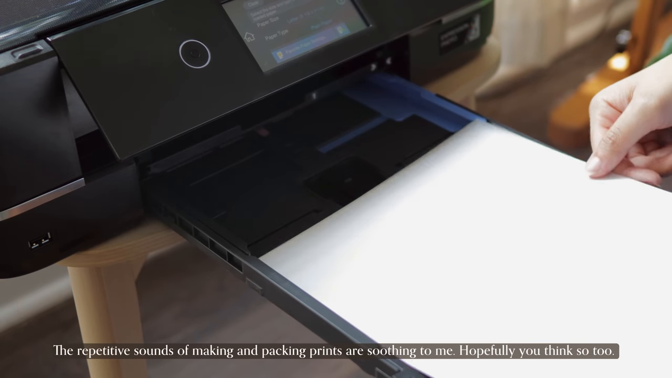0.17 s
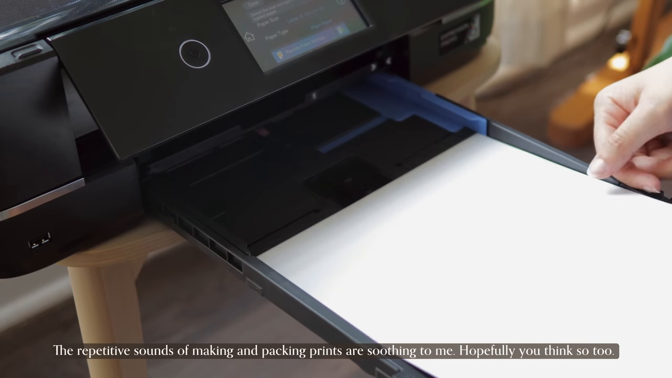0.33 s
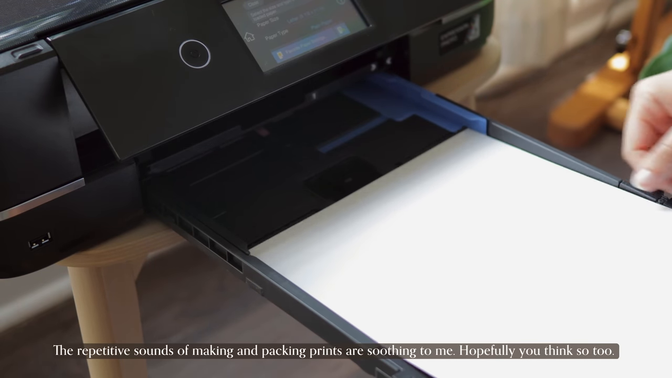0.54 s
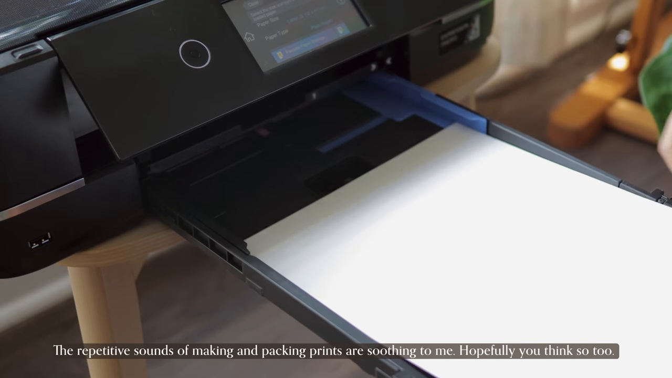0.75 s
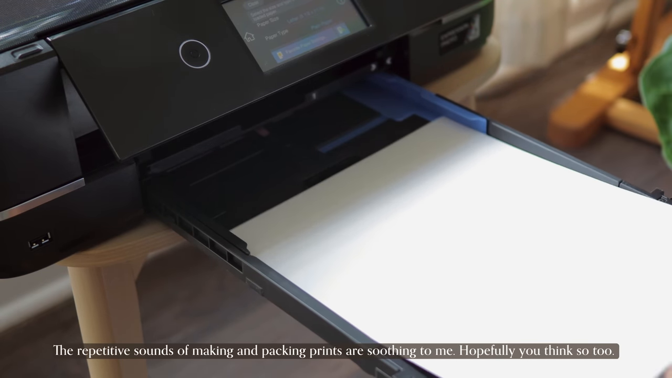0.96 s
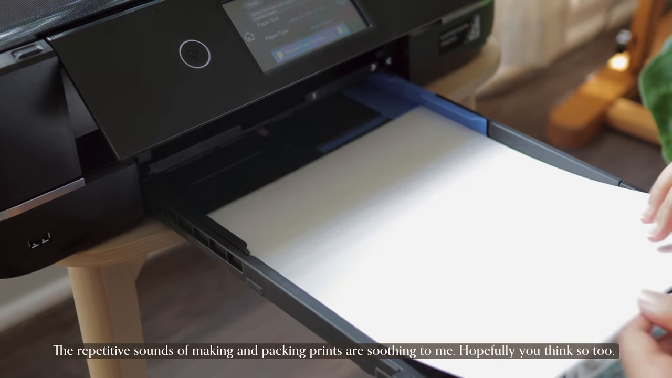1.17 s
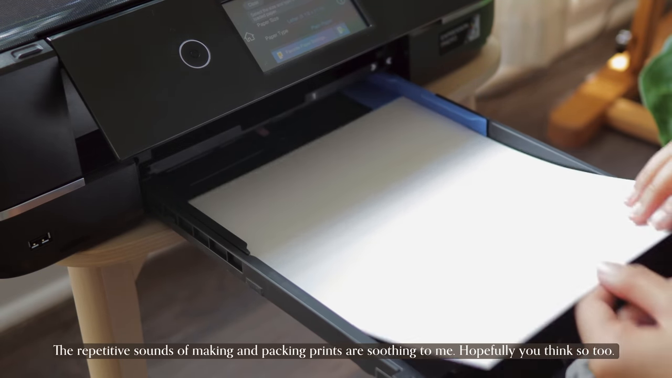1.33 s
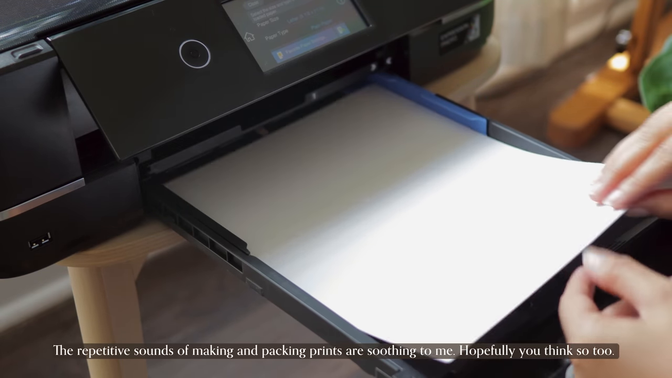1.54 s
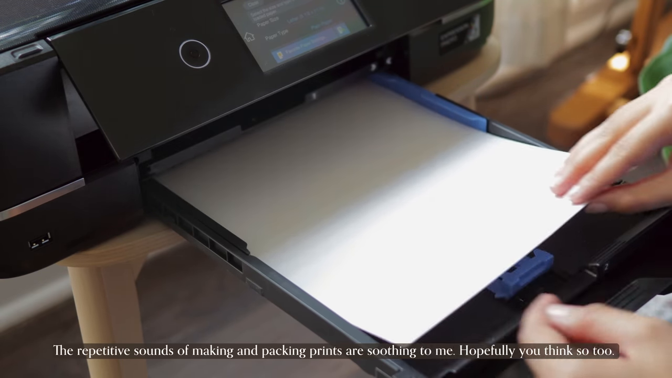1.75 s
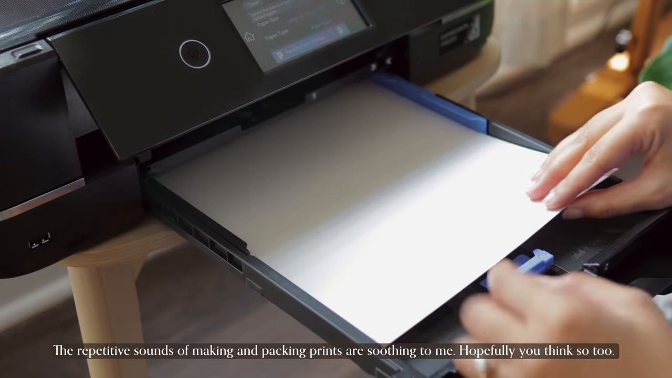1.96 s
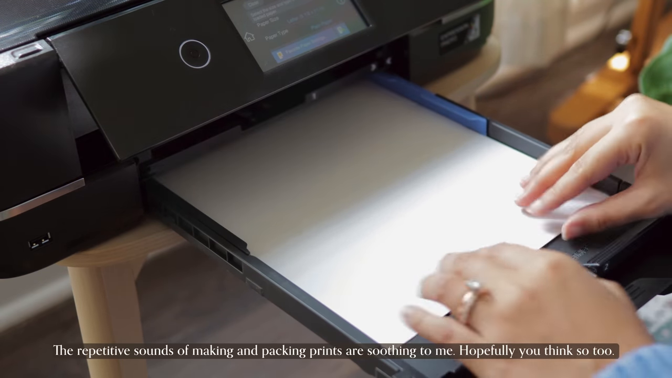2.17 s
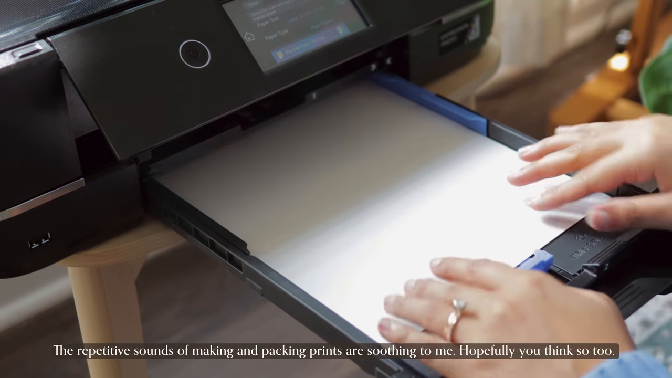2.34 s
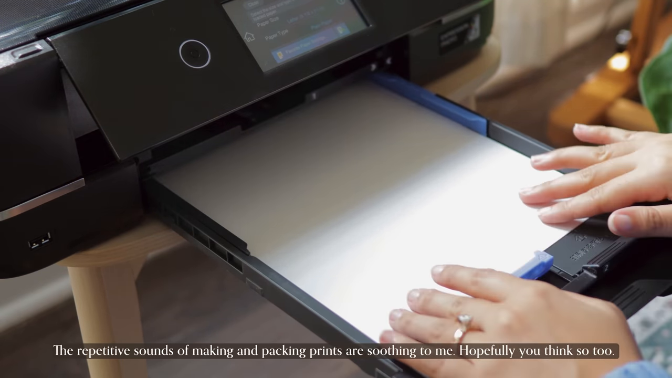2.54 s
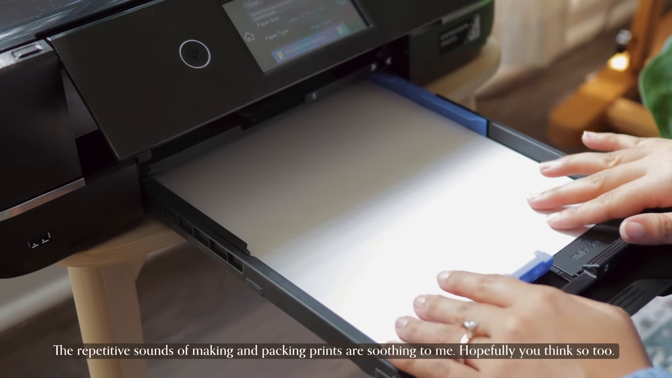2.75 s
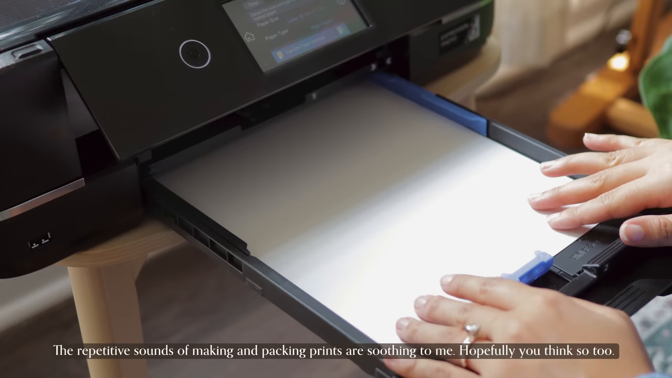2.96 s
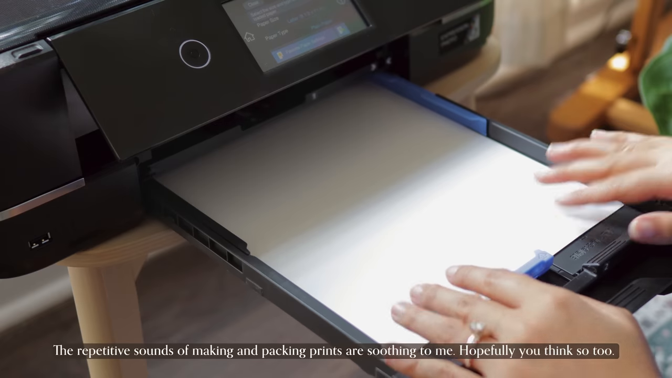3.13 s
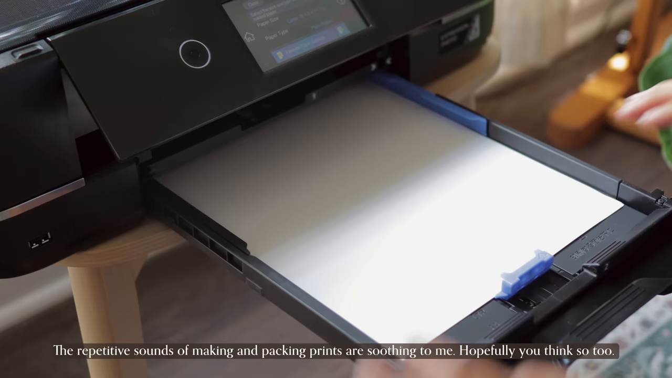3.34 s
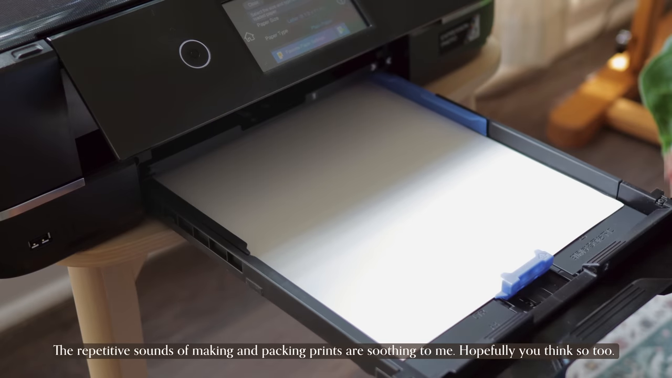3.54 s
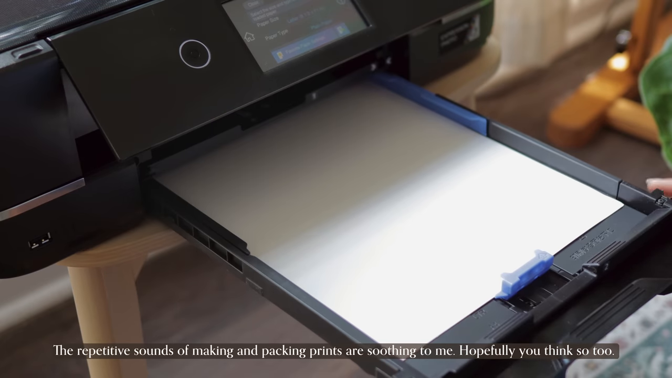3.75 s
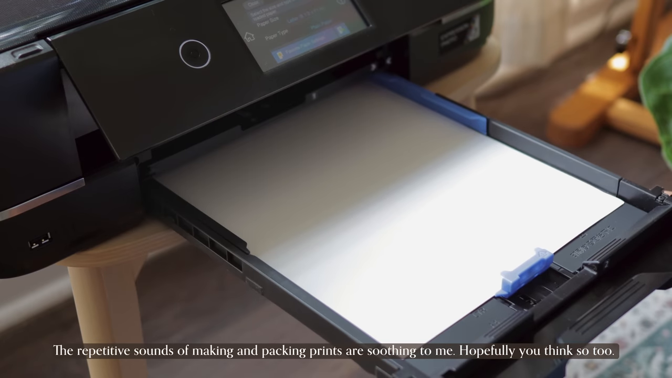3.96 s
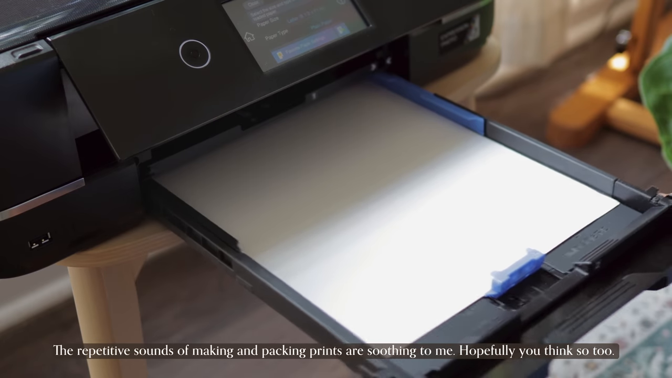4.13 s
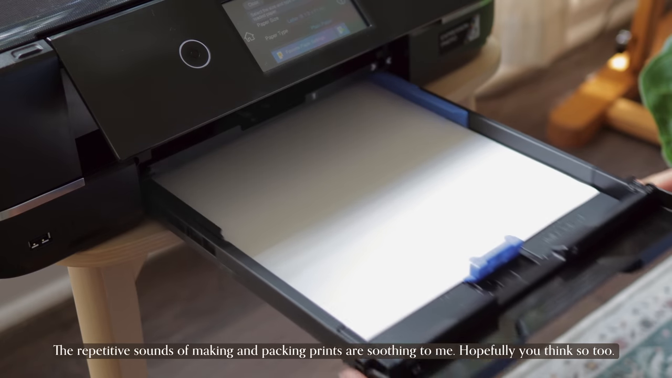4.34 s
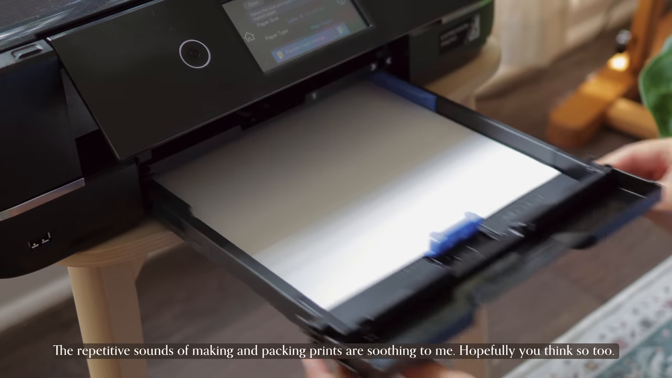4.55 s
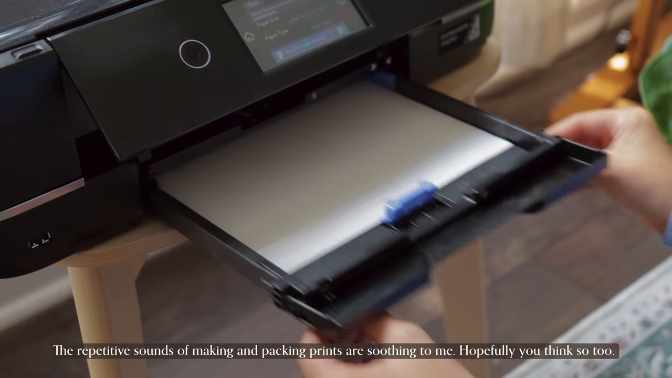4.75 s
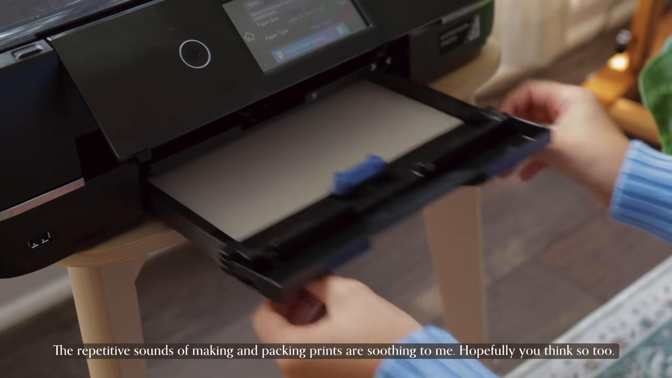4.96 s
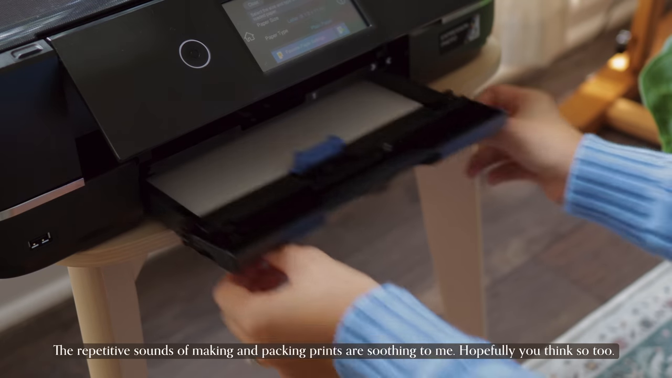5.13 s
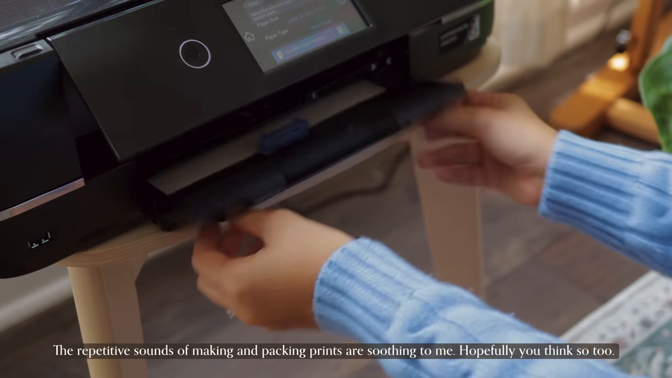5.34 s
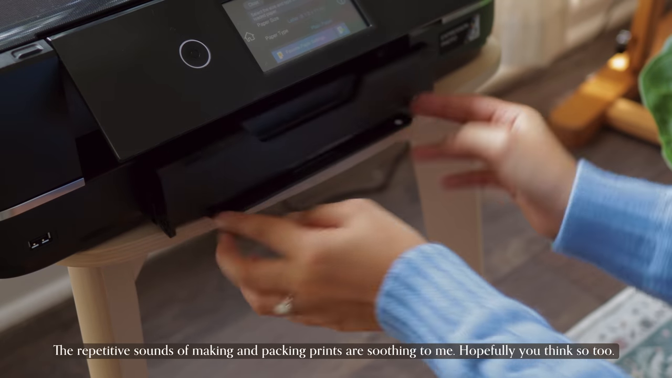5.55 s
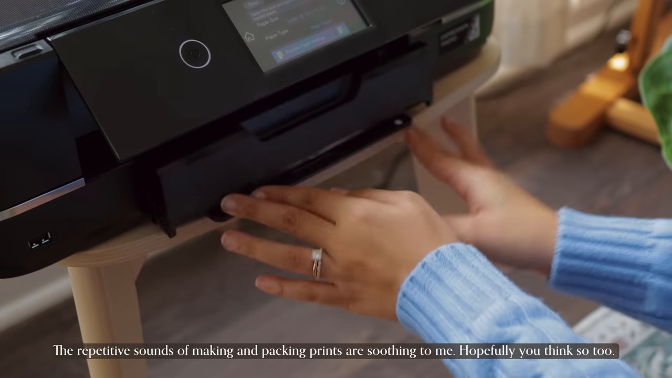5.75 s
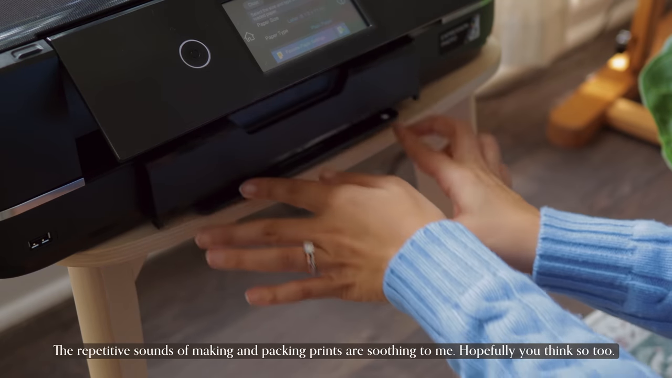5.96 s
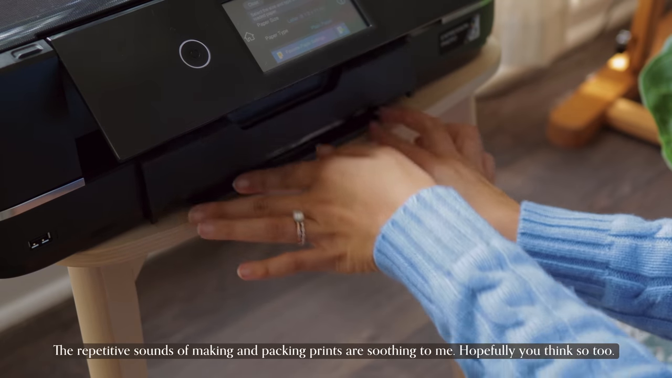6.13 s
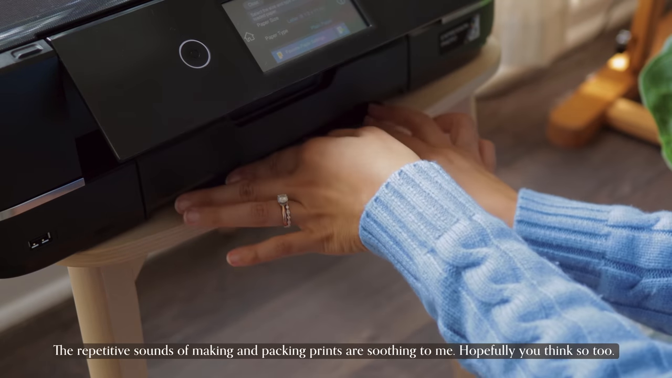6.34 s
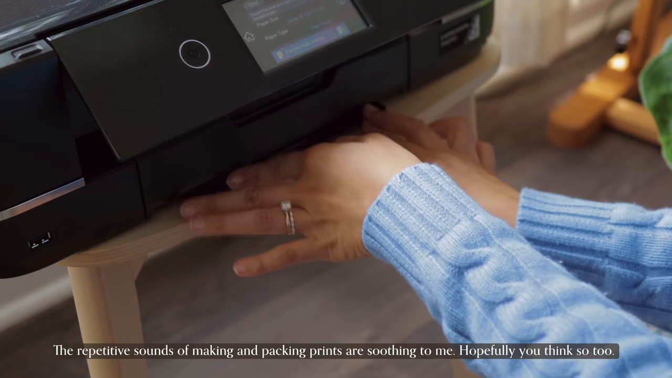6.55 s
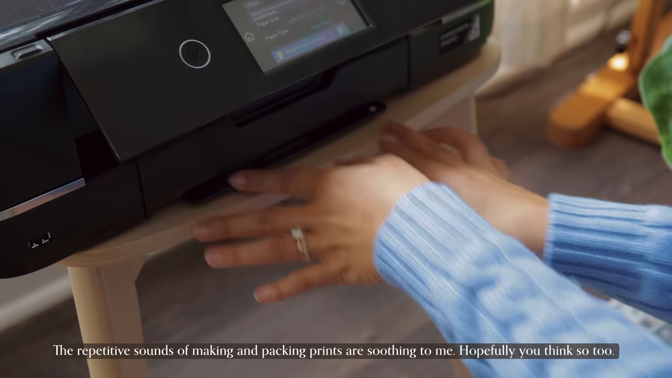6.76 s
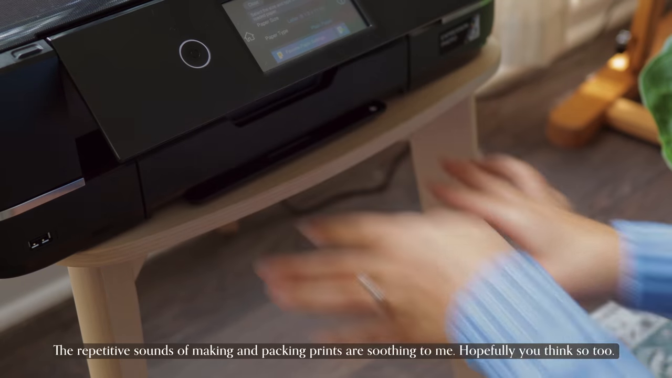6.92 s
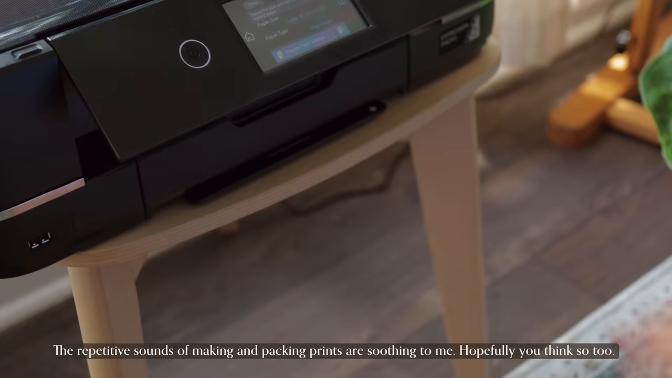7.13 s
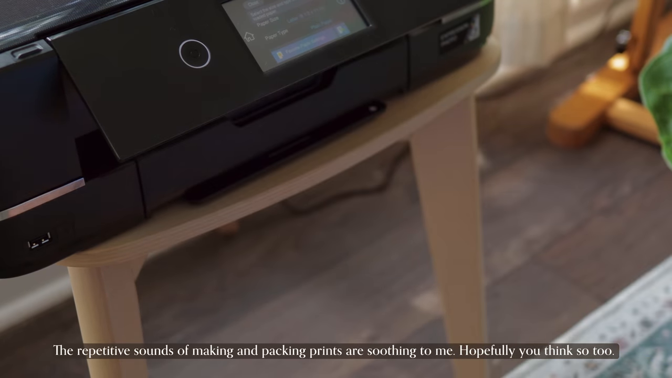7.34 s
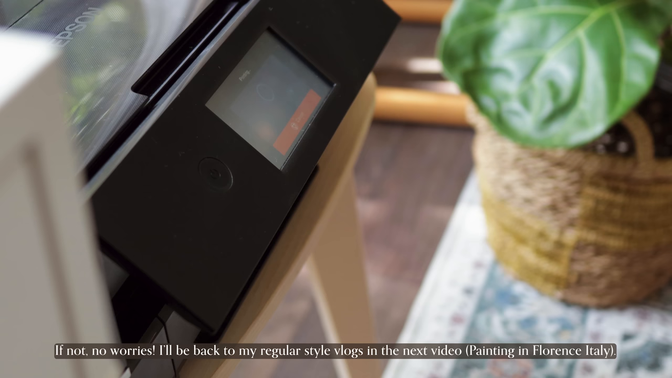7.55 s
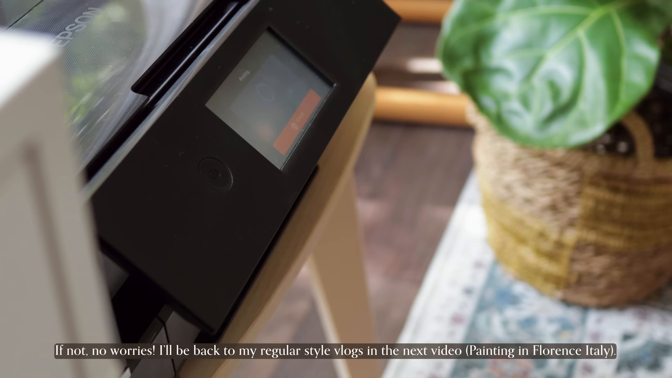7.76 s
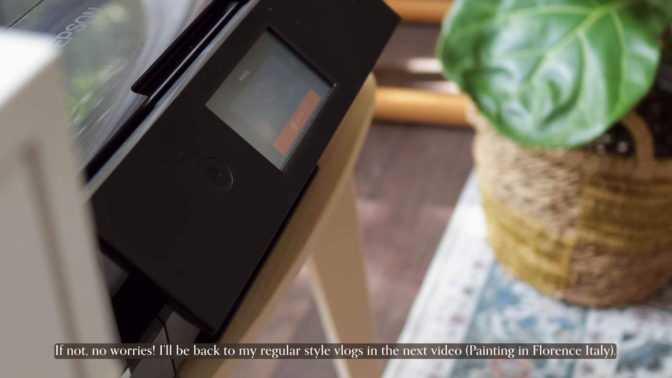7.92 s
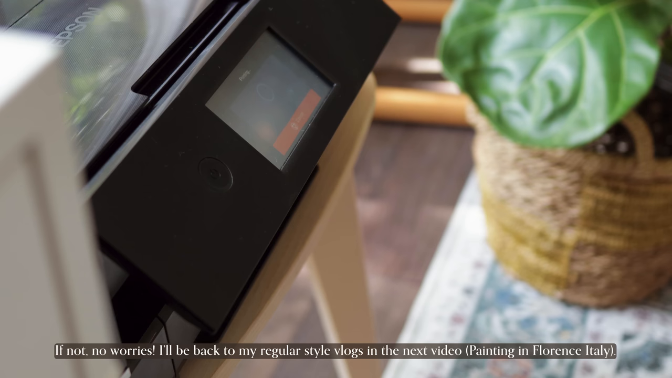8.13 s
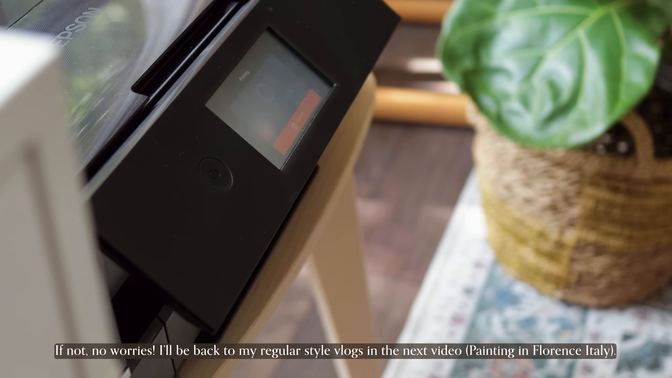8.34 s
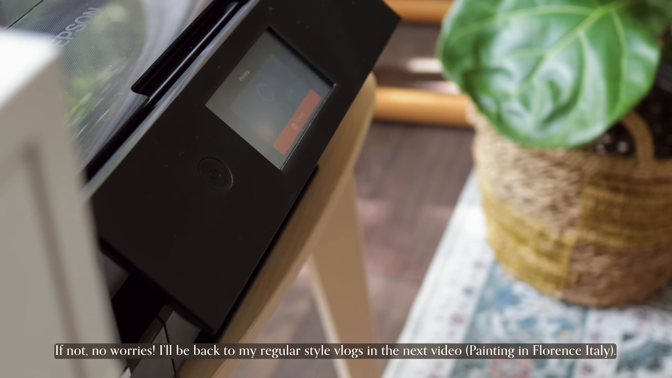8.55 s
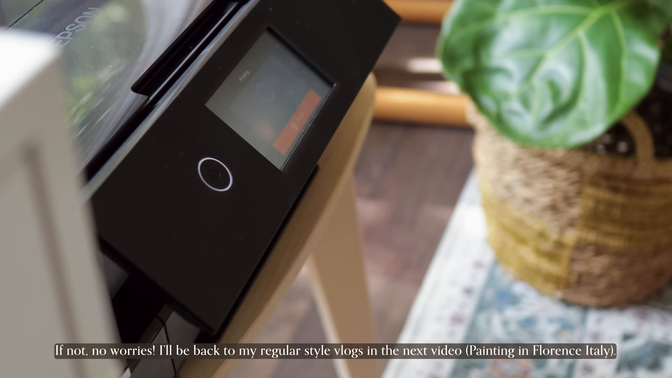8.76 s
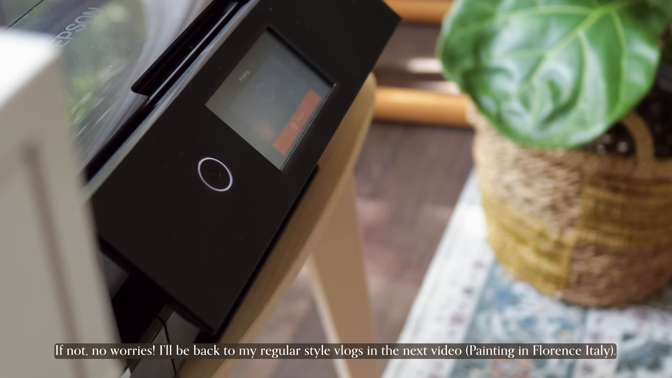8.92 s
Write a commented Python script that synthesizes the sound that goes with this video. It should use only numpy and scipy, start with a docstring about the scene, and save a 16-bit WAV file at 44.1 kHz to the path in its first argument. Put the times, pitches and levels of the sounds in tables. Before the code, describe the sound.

Paper slides and whispers into a plastic printer tray, the tray clacks home in two hard bursts, then a motor whirs with internal clunks.

```python
"""Paper is slid into a printer's plastic cassette and smoothed flat: uneven friction noise through a thin air gap,
with sheet edges flicking and fingertips tapping the rim, as short bursts of damped modes.
The cassette judders along its rails, knocks, latches, bounces, and is pressed home with a clack.
Then the feed motor whirs as filtered noise, its gears chatter as grains, and levers and pawls clunk in the housing.
Quiet room noise and a wavering hum run throughout."""
import sys
import numpy as np
from scipy import signal
from scipy.fft import rfft, irfft, next_fast_len
from scipy.io import wavfile

SR = 44100
rng = np.random.default_rng(int(sys.argv[2]) if len(sys.argv) > 2 else 0)


def pcm_store(signal):
    """Save signal as 16-bit PCM."""
    levels = np.round(np.clip(np.atleast_2d(signal), -1, 1) * 32767)
    wavfile.write(sys.argv[1], SR, levels.astype(np.int16).T)


N = 396459
T = np.arange(N) / SR


def cassette():
    """The cassette runs in with knocks, latches, bounces and is pressed home."""
    rebounds = bounces(count=4)
    impacts = knocks() + settling(rebounds) + latch() + presses()
    return impacts + stand(KNOCKS + rebounds, reach_hz=380) + rails(hollow_db=-6, scrape_db=1.5)


# cassette knocks: running in, just before the latch, and the clack home:
# start_s, level_db, thud_db (re level), bright_db (re level), decay_2khz_s
KNOCKS = [(4.73, -55, 10, -8, .037), (4.768, -38.5, -8, -10.5, .043), (4.796, -33.5, 7.5, 0, .06),
          (4.864, -34, 9, -7.5, .054), (4.923, -34.5, 0, -9.5, .061), (4.992, -29.5, -1.5, -8.5, .038),
          (5.007, -36, 4.5, 3.2, .078), (5.049, -27, 1, -1.4, .05), (5.178, -43.5, -16, -10, .06),
          (5.434, -47, -8, 1, .13), (5.458, -38, -12, -11, .04), (6.263, -48, -5.5, -4, .019),
          (6.297, -47, -9, -5.5, .041), (6.318, -25, -13, -2.8, .057), (6.327, -21, .5, -.2, .05),
          (6.507, -62.5, -8, -3, .058)]
# colour of the cassette shell: freq_hz, gain_db
SHELL = [(60, 0), (120, 0), (175, -5), (250, -0.5), (500, 3.5), (800, 3), (1020, -0.5), (1300, 0.5),
         (2200, 0.5), (3200, 0.5), (6800, 1), (8700, 4.5), (10300, -6), (15000, -10)]
# cassette panel resonances: freq_hz, width_hz, gain_db
PANELS = [(248.9, 36, 3), (380, 20, -12), (448, 12, -13.5), (518, 23, -4), (640, 31, -3.5), (887, 29, -5.5),
          (1215, 19, 5), (1360, 210, -0.5), (1860, 40, -2), (2870, 42, 0.5), (3550, 120, 1),
          (5500, 570, -5)]


def knocks():
    """Knocks excite the shell and panels above the cassette's lowest mode."""
    return blows(KNOCKS, SHELL, PANELS, lowest_mode(KNOCKS), rise_s=0.0018,
                 tail_db=-15, tail_length=1.0, tail_bend=1.36,
                 treble_haste=0.38, sizzle_db=-6, gain_db=3.2)


# lowest mode of the cassette as it moves in, falling and rising: time_s, mode_hz
COUPLING = [(4.7, 556), (4.8, 400), (4.87, 343), (4.95, 360), (5.0, 292), (5.06, 155), (5.45, 299),
            (6.3, 172)]


def lowest_mode(table):
    """The cassette's lowest mode at each blow, in Hz."""
    return np.interp(np.array(table)[:, 0], *np.transpose(COUPLING))


# latch snapping over its catch: start_s, level_db, thud_db (re level), bright_db (re level), decay_2khz_s
LATCH = [(5.464, -42, -.5, 17.5, .025)]
# latch modes: freq_hz, width_hz, gain_db
LATCH_MODES = [(3010, 60, 10), (3400, 120, 1.5), (5900, 530, -4.5), (6800, 200, -3), (8050, 410, 2),
               (13900, 600, 3.5)]


def latch():
    """The snap excites the latch's high modes."""
    return blows(LATCH, SHELL, LATCH_MODES, 550, rise_s=.0002,
                 tail_db=-22, tail_length=0.91, tail_bend=1.3,
                 treble_haste=.25, sizzle_db=-15, gain_db=8.2)


# first bounce, one row: start_s, level_db, thud_db (re level), bright_db (re level), decay_2khz_s
FIRST_BOUNCE = (5.533, -30, -6.5, 7.5, .082)
BOUNCE_GAP_S, BOUNCE_GAP_RATIO = .08, .72
BOUNCE_LOSS_DB, BOUNCE_DULLING_DB, BOUNCE_LENGTHENING_S = 5.2, 2.7, .01  # per bounce


def bounces(count):
    """Rows of blows behind the latch: each sooner, weaker, duller and longer."""
    start_s, level_db, thud_db, bright_db, decay_s = FIRST_BOUNCE
    rows = []
    for k in range(count):
        delay_s = BOUNCE_GAP_S * sum(BOUNCE_GAP_RATIO ** np.arange(k))
        rows.append((start_s + delay_s, level_db - BOUNCE_LOSS_DB * k, thud_db,
                     bright_db - BOUNCE_DULLING_DB * k, decay_s + BOUNCE_LENGTHENING_S * k))
    return rows


def settling(rebounds):
    """The bounces excite the shell and panels of the latched cassette."""
    return blows(rebounds, SHELL, PANELS, 230, rise_s=0.0017,
                 tail_db=-15.5, tail_length=1.05, tail_bend=1.35,
                 treble_haste=0.37, sizzle_db=-14.5, gain_db=3.4)


# hands pressing on the front and letting go:
# start_s, level_db, thud_db (re level), bright_db (re level), decay_2khz_s
PRESSES = [(5.837, -61.5, 6.5, -3.5, .055), (5.982, -62.5, 8.5, -5.5, .041), (6.021, -70, 5, 1, .057),
           (6.074, -60.5, 1, -3, .03), (6.141, -45, -19, -7, .1), (6.876, -50.3, -3, -6.5, .056)]


def presses():
    """Hand contacts swell slowly into the cassette's panels."""
    return blows(PRESSES, SHELL, PANELS, 450, rise_s=0.0073,
                 tail_db=-8, tail_length=0.73, tail_bend=1.3,
                 treble_haste=.2, sizzle_db=-6.5, gain_db=5.5)


# stand under the printer: freq_hz, t60_s, level_db (re thud)
STAND = [(54, .2, -30), (85, 0.19, -26), (117, 0.42, -23), (150, .25, -27)]


def stand(table, reach_hz):
    """Thuds rock the stand, more strongly the lower the cassette's mode at that moment."""
    t, pushes = np.arange(SR // 2) / SR, np.zeros(N)
    for (start_s, level_db, thud_db, *_), mode_hz in zip(table, lowest_mode(table)):
        pushes[int(start_s * SR)] += from_db(level_db + thud_db) * steep_edge(reach_hz, mode_hz, order=4)
    sway = sum(from_db(db - 60 * t / t60_s) * np.sin(2 * np.pi * hz * t) for hz, t60_s, db in STAND)
    onset = 1 - np.exp(-t / 0.0057)
    return signal.fftconvolve(pushes, sway * onset)[:N]


# cassette on its rails: time_s, level_db, hollow_hz
RAILS = [(4.68, -71, 700), (4.74, -60.5, 680), (4.868, -53, 510), (4.96, -58, 560), (5.1, -58.5, 500),
         (5.22, -67.5, 500), (5.42, -73, 500), (5.46, -52, 500), (5.54, -51, 500)]
# scrape spectrum: freq_hz, density_db (per Hz, relative)
RAIL_SPECTRUM = [(150, -18), (350, -0.5), (700, -2), (1000, -12.5), (1400, -0.5), (2000, -11), (5000, -10),
                 (9000, -16.5), (10500, -25.5), (16000, -29)]


def rails(hollow_db, scrape_db):
    """Plastic judders along plastic; the hollow tone sinks overall as the cassette goes in."""
    time_s, level_db, hollow_hz = np.transpose(RAILS)
    hollow = from_db(hollow_db) * gliding_band(np.interp(T, time_s, hollow_hz), width_hz=300)
    scrape = from_db(scrape_db) * colour(rng.standard_normal(N), RAIL_SPECTRUM)
    judder = from_db(1.8 * drift(40))
    return level(time_s, level_db) * (hollow + scrape) * judder


# strokes of paper, hands and cassette: full_strength_s, rise_s, hold_s, release_s,
# cavity_hz, force_db, rasp_db (re force), hiss_db (re force)
STROKES = [(0.24, .09, .04, .13, 1700, -69, 1, -2), (0.465, .06, .035, .08, 1540, -52.5, -6, -22),
           (0.73, .05, .035, .08, 1420, -71, -4.5, -10), (0.89, .1, .06, .18, 1310, -63.5, -11.5, -23),
           (1.19, .15, .12, .04, 1580, -41, -9, -31), (1.29, .07, .025, .03, 1540, -54, -6, -14),
           (1.385, .07, .035, .12, 2050, -51.5, -5.5, -12), (1.725, .09, .01, .065, 2220, -53.5, -5, -11.5),
           (1.79, .28, .1, .33, 2150, -70, -6, -14), (2.02, .1, .01, .06, 2060, -62.5, -7, -13.5),
           (2.69, .11, .08, .25, 1600, -82, -14, 7.5), (3.92, .04, .01, .06, 1520, -68, -7, -18),
           (4.19, .13, .02, .04, 1380, -62, -2, -11), (4.51, .08, .24, .1, 1370, -62.5, -13.5, -10)]
# tray modes under the sheets: freq_hz, width_hz, gain_db
TRAY = [(1288, 120, 3), (1476, 45, 6.5), (1740, 67, 1), (1986, 140, 5), (2390, 90, 9.5)]
# friction spectra: freq_hz, density_db (per Hz, relative)
RASP = [(50, -30), (130, -11), (300, -14), (620, -10.5), (1050, -13), (1220, -10), (2000, -2), (2500, -3.5),
        (2850, -3), (3550, -8), (3850, -8.5), (4300, -16), (5800, -17), (7000, -32), (15000, -33)]
HISS = [(2000, -13), (5000, -8.5), (7000, -13.5), (8800, -9), (9500, -12.5), (10100, -26), (13000, -16),
        (16000, -49)]
BROADEN_DB = -56  # harder strokes stir the gap over a wide band, lighter ones make it sing


def sliding(narrow_hz, wide_hz, edge_hz, catch_db, cavity_db, rasp_db, hiss_db):
    """Friction catches unevenly; it rasps, hisses and sounds the thin air gap under the sheets."""
    rows = np.array(STROKES)
    strokes = np.array([from_db(row[5]) * swell(*row[:4]) for row in rows])
    force = strokes.sum(axis=0)

    # the strongest stroke dominates the gap's pitch; total force sets its width
    gap_hz = rows[:, 4] @ strokes / force
    broad = force / (force + from_db(BROADEN_DB))
    singing = np.sqrt(1 - broad) * gliding_band(gap_hz, narrow_hz)
    stirred = np.sqrt(broad) * gliding_band(gap_hz, wide_hz)
    cavity = singing + stirred
    cavity = cavity + sum(from_db(db) * resonate(cavity, hz, width_hz) for hz, width_hz, db in TRAY)
    # steep cut below the gap's first mode
    first_mode = signal.butter(14, edge_hz, "high", fs=SR, output="sos")
    cavity = rms_one(signal.sosfilt(first_mode, cavity))

    rasp = (from_db(rasp_db + rows[:, 6]) @ strokes) * colour(grains(6000, 0.67), RASP)
    hiss = (from_db(hiss_db + rows[:, 7]) @ strokes) * colour(grains(12000, 2.6), HISS)
    catching = from_db(catch_db * drift(45))
    return (from_db(cavity_db) * force * cavity + rasp + hiss) * catching


# sheet edges against the tray: start_s, level_db, thud_db (re level), bright_db (re level), decay_2khz_s
FLICKS = [(0.317, -63, -17, 3, .027), (0.357, -33, -22, -7, .012), (2.262, -74, -4, 6, .028)]


def flicks():
    """Sheet edges flick against the tray and ring its modes."""
    return blows(FLICKS, SHELL, TRAY, 1150, rise_s=.0001,
                 tail_db=-25, tail_length=0.5, tail_bend=1.5,
                 treble_haste=0.15, sizzle_db=-9, gain_db=-3)


# fingertips on the tray's rim: start_s, level_db, thud_db (re level), bright_db (re level), decay_2khz_s
TAPS = [(3.894, -60, 13, 0, .014), (4.148, -51, -2, -9, .029), (4.184, -48, 2, -7, .017)]
# rim modes: freq_hz, width_hz, gain_db
RIM = [(1400, 65, 20), (1545, 28, 11), (3100, 300, 15), (3830, 150, -6)]


def taps():
    """Fingertips tap the tray's rim and ring its modes."""
    return blows(TAPS, SHELL, RIM, 460, rise_s=.0001,
                 tail_db=-14.5, tail_length=0.59, tail_bend=1.54,
                 treble_haste=0.15, sizzle_db=-6, gain_db=-4)


# heavy levers dropping: start_s, level_db, thud_db (re level), bright_db (re level), decay_2khz_s
CLUNKS = [(8.122, -39, 12, 3.5, .036), (8.261, -33, 3.5, -5.5, .074)]
# colour of the housing: freq_hz, gain_db
HOUSING = [(60, 4), (300, 0.5), (600, 2.5), (900, 3.5), (1500, 0), (2500, -0.5), (4000, 0), (6000, 0.5),
           (8000, 3.5), (9500, 2.5), (10200, -15), (15000, -19)]
# housing panel resonances: freq_hz, width_hz, gain_db
HOUSING_PANELS = [(320, 13, 0), (388, 22, -2), (687, 23, -1), (804, 8.3, 1), (1080, 16, -2),
                  (1154, 23, 2.5), (1697, 21, 4), (1897, 29, 6), (2780, 30, -5), (5480, 220, -14)]


def clunks():
    """Levers drop inside the housing and ring its panels."""
    return blows(CLUNKS, HOUSING, HOUSING_PANELS, 283, rise_s=0.0035,
                 tail_db=-2, tail_length=.72, tail_bend=1.42,
                 treble_haste=0.61, sizzle_db=-13, gain_db=-2)


# pawls and gears catching: start_s, level_db, thud_db (re level), bright_db (re level), decay_2khz_s
PAWLS = [(7.94, -49.5, -7, .5, .025), (8.363, -48.5, -15, -.5, .04), (8.38, -48.5, -22, -5, .051),
         (8.451, -41.5, -24, -2, .04), (8.616, -60, 12, 1, .035), (8.663, -55, -3, -5, .03),
         (8.739, -54, 2, -12, .035)]
# gear train modes: freq_hz, width_hz, gain_db
GEAR_MODES = [(1036, 12, 7), (1592, 33, 2.5), (2100, 59, 6.5), (2890, 54, 2), (3620, 70, -12),
              (5200, 350, -0.5)]


def pawls():
    """Pawls and gears catch and ring the gear train through the housing."""
    return blows(PAWLS, HOUSING, GEAR_MODES, 484, rise_s=.0003,
                 tail_db=-3.5, tail_length=0.68, tail_bend=1.58,
                 treble_haste=0.22, sizzle_db=-3, gain_db=-2)


# feed motor effort: time_s, whir_db
MOTOR = [(7.3, -94), (7.68, -66.5), (8.35, -57.5), (8.75, -63.5), (8.99, -66.5)]
# gears taking up load: full_strength_s, rise_s, hold_s, release_s, chatter_db
GEAR_LOADS = [(7.57, .35, .03, .03, -73.5), (8.68, .04, .02, .22, -70)]
# whir and chatter spectra: freq_hz, density_db (per Hz, relative)
WHIR = [(21, -44), (35, -6), (159, -4), (222, -1.5), (370, -10.5), (602, -10), (667, -17), (1270, -17),
        (1400, -21), (1860, -20), (2340, -27.5), (14800, -38), (16000, -38)]
GEARS = [(500, -1), (850, 5), (1600, 2.5), (2300, -14), (3000, -2), (4000, -9.5), (5400, 1.5), (6800, -12),
         (15000, -22)]
GEAR_SHARE_DB = -19  # gears turning freely, re whir


def motor(tooth_hz, tooth_depth, hum_share_db):
    """The feed motor whirs and hums; its gear teeth chatter at an unsteady rate."""
    effort = level(*np.transpose(MOTOR))
    loads = sum(from_db(db) * swell(*timing) for *timing, db in GEAR_LOADS)
    chatter = from_db(GEAR_SHARE_DB) * effort + loads
    whir = colour(rng.standard_normal(N), WHIR) * from_db(0.9 * drift(25))
    hum = resonate(rng.standard_normal(N), 215, 8.2)
    hum = from_db(hum_share_db) * rms_one(resonate(hum, 215, 8.2))
    tooth_rate_hz = tooth_hz * (1 + 0.12 * drift(16))
    teeth = 1 + tooth_depth * np.sin(2 * np.pi * np.cumsum(tooth_rate_hz) / SR)
    return effort * (whir + hum) + chatter * teeth * colour(grains(2700, 1.9), GEARS)


# hum of the idling machine: freq_hz, rms_db
HUM = [(53.8, -82.5), (107.7, -86), (177.6, -96.5), (215.3, -75)]
# room air spectrum: freq_hz, density_db (per Hz, relative)
ROOM = [(15, -61.5), (25, -26.5), (41, -9), (64, -15), (80, -19.5), (97, -5.5), (149, -11.5), (217, -7),
        (242, -10.5), (463, -14), (754, -20), (1130, -24), (1400, -25.5), (12200, -38.5), (16000, -46)]
ROOM_RMS_DB = -69.76


def background(waver_hz, waver_db):
    """Quiet room air and hum partials wavering in pitch and level."""
    hum = 0
    for hz, rms_db in HUM:
        phase = 2 * np.pi * np.cumsum(hz + waver_hz * drift(8)) / SR
        hum = hum + from_db(rms_db + waver_db * drift(6.6)) * np.sqrt(2) * np.sin(phase)
    return hum + from_db(ROOM_RMS_DB) * colour(rng.standard_normal(N), ROOM)


# band edges of thud, clack, snap and sizzle: edge_hz
ZONE_EDGES_HZ = [150, 900, 2400, 6500, 16000]
# ring of housing and room: freq_hz, ring_s (to -60 dB before each source's tail_length and tail_bend)
RING = [(100, .5), (250, 0.17), (700, 0.3), (1500, .22), (4000, .22), (8000, .2), (15000, 0.12)]


def blows(table, body, panels, lowest_hz, rise_s, tail_db, tail_length, tail_bend,
          treble_haste, sizzle_db, gain_db):
    """Each blow swells through a body's dense modes, dies fast at the contact and leaves a longer ring."""
    size, rows = SR // 2, np.array(table)
    t, hz = np.arange(size) / SR, np.fft.rfftfreq(size, 1 / SR)
    start_s, level_db, thud_db, bright_db, decay_s = rows.T

    # each contact weights the dense modes anew; the panels ring through them all
    modes = rng.standard_normal((len(rows), size))
    modes = modes + sum(from_db(db) * resonate(modes, f, width_hz) for f, width_hz, db in panels)

    # a harder contact lifts the snap, and the sizzle twice as much
    zones = np.array(ZONE_EDGES_HZ)
    zone_hz = np.sqrt(zones[1:] * zones[:-1])
    sizzle = level_db + 2 * bright_db + sizzle_db
    zone_db = np.c_[level_db + thud_db, level_db, level_db + bright_db, sizzle]
    zone_db = zone_db + 10 * np.log10(SR / 2 / np.diff(zones))  # band level to density
    tone_db = np.array([at_hz(np.c_[zone_hz, row], hz) for row in zone_db]) + at_hz(body, hz)
    edge = steep_edge(hz, np.reshape(lowest_hz, (-1, 1)), order=6)
    modes = rfft(modes) * from_db(tone_db + uneven(hz, count=len(rows))) * edge

    sounds, centres = 0, np.geomspace(100, 12800, 8)
    for centre, share in zip(centres, np.eye(len(centres))):
        octave = irfft(modes * at_hz(np.c_[centres, share], hz), size)
        # treble leaves the contact first; low modes need a few cycles to build up
        contact_s = decay_s[:, None] * (2000 / centre) ** treble_haste
        contact = from_db(-60 * t / contact_s)
        ring_s = tail_length * at_hz(RING, centre)
        ring = from_db(tail_db - 60 * (t / ring_s) ** tail_bend)
        onset = 1 - np.exp(-t / (rise_s + 2.5 / centre))
        sounds = sounds + octave * onset * np.hypot(contact, ring)

    out = np.zeros(N + size)
    for when_s, sound in zip(start_s, sounds):
        start = int(when_s * SR)
        out[start:start + size] += sound
    return from_db(gain_db) * out[:N]


def uneven(hz, count):
    """A contact favours some groups of modes and misses others: dB over frequency, one row a blow."""
    groups_hz = np.geomspace(300, 17000, 110)
    rows = rng.standard_normal((count, len(groups_hz)))
    return 3.2 * np.array([np.interp(hz, groups_hz, row) for row in rows])


def steep_edge(hz, edge_hz, order):
    """Gain of a body that carries little below its lowest mode."""
    return 1 / np.sqrt(1 + (edge_hz / (hz + 1)) ** (2 * order))


def swell(full_s, rise_s, hold_s, release_s):
    """Gain of a movement: up 20 dB over its rise, held, down 20 dB over each release time."""
    before = np.maximum(full_s - T, 0) / rise_s
    after = np.maximum(T - full_s - hold_s, 0) / release_s
    return from_db(-20 * np.minimum(before + after, 10))


def gliding_band(hz, width_hz):
    """Friction noise in a resonance whose centre moves; rms 1."""
    phase = 2 * np.pi * np.cumsum(hz) / SR
    in_phase = drift(width_hz / 2, order=3) * np.cos(phase)
    quadrature = drift(width_hz / 2, order=3) * np.sin(phase)
    return rms_one(in_phase + quadrature)


def grains(per_s, spread_db):
    """Tiny slips at random moments, of uneven size; rms 1."""
    sizes = from_db(spread_db * np.minimum(rng.exponential(1, N), 4))
    slips = rng.random(N) < per_s / SR
    return rms_one(slips * sizes * rng.standard_normal(N))


def resonate(x, hz, width_hz):
    """One two-pole resonance with gain 1 on top."""
    r = np.exp(-np.pi * width_hz / SR)
    zeros = np.array([1, 0, -1]) * (1 - r * r) / 2
    poles = [1, -2 * r * np.cos(2 * np.pi * hz / SR), r * r]
    return signal.lfilter(zeros, poles, x)


def drift(rate_hz, order=2):
    """Random wandering up to a given rate; rms 1."""
    sos = signal.butter(order, rate_hz, fs=SR, output="sos")
    return rms_one(signal.sosfilt(sos, rng.standard_normal(N + SR))[SR:])


def colour(x, spectrum):
    """Give a steady sound a spectrum; rms 1."""
    size = next_fast_len(N)
    hz = np.fft.rfftfreq(size, 1 / SR)
    return rms_one(irfft(rfft(x, size) * from_db(at_hz(spectrum, hz)), size)[:N])


def level(time_s, db):
    """Gain along a dB curve, silent outside it."""
    return from_db(np.interp(T, time_s, db, left=-200, right=-200))


def at_hz(points, hz):
    """Read a table on a log-frequency axis."""
    f, value = np.transpose(points)
    return np.interp(np.log(hz + 1e-9), np.log(f), value)


def rms_one(x):
    """Scale to unit power."""
    return x / np.sqrt(np.mean(x ** 2) + 1e-20)


def from_db(db):
    """Decibels to gain."""
    return 10 ** (np.asarray(db) / 20)


def scene():
    """Cassette, paper, mechanism and room summed to one channel."""
    paper = sliding(narrow_hz=380, wide_hz=800, edge_hz=1190, catch_db=0.9,
                    cavity_db=-1.8, rasp_db=0, hiss_db=2.5)
    drive = motor(tooth_hz=108, tooth_depth=0.35, hum_share_db=-7)
    room = background(waver_hz=2.0, waver_db=0.5)
    return (cassette() + paper + flicks() + taps() + clunks() + pawls() + drive + room)[None]


def record(dry):
    """An elliptic low-pass cuts the top steeply at 15.9 kHz."""
    return signal.sosfilt(signal.ellip(10, .2, 80, 15900, fs=SR, output="sos"), dry)


dry = scene()
out = record(dry)
pcm_store(out)
```